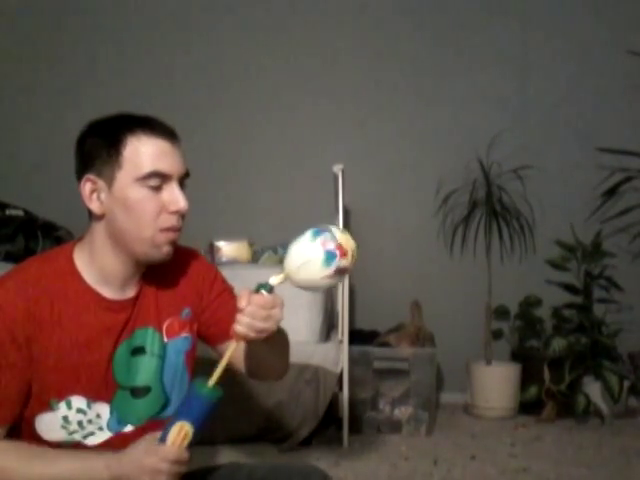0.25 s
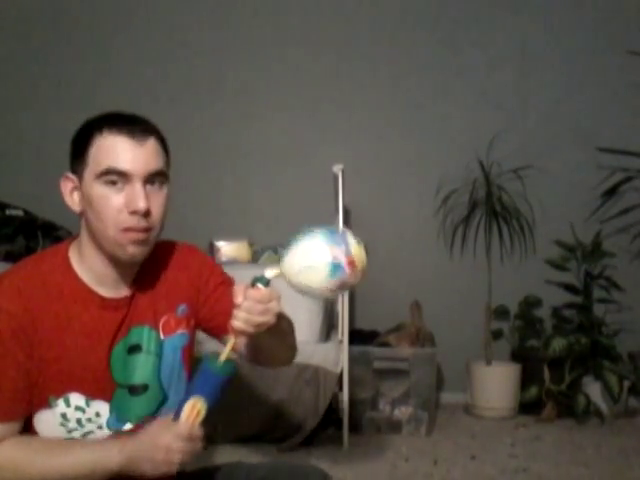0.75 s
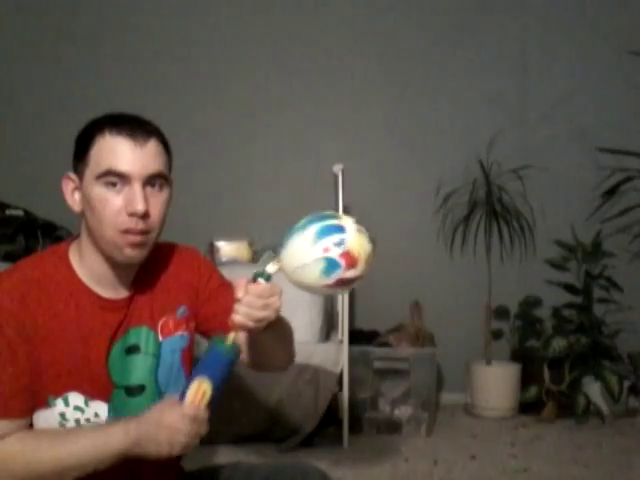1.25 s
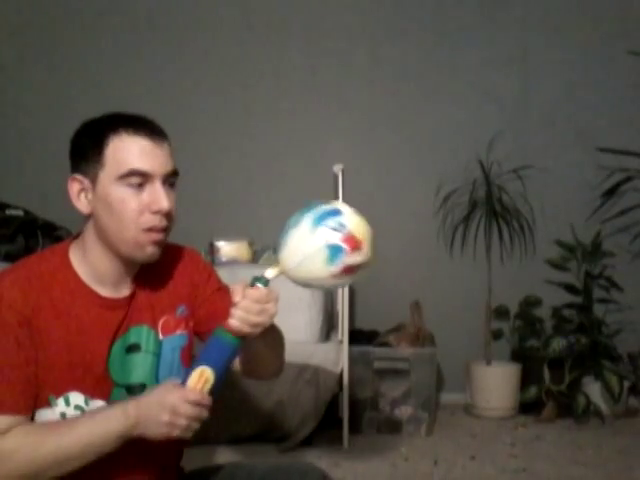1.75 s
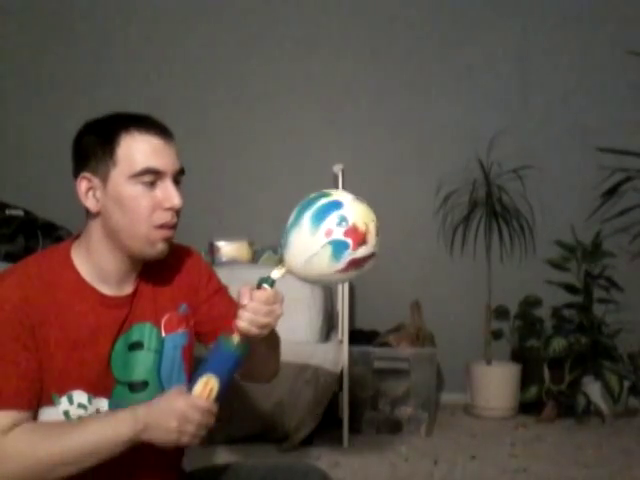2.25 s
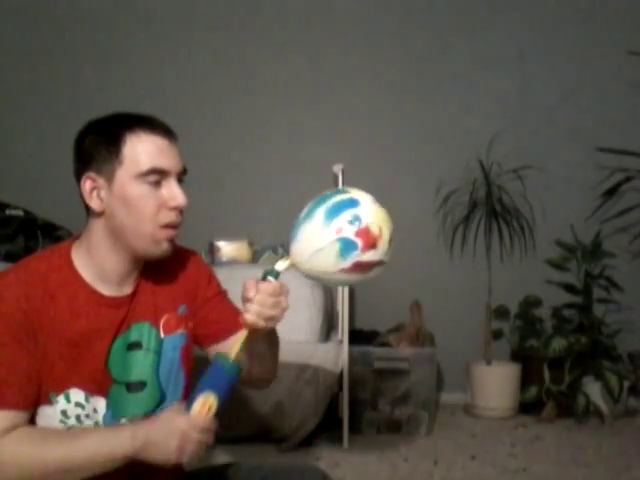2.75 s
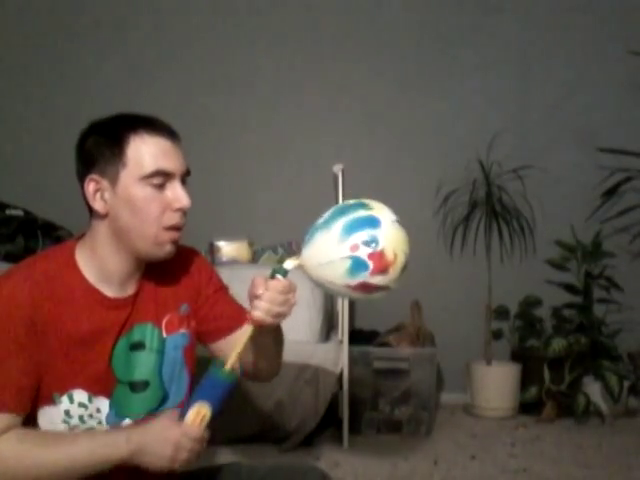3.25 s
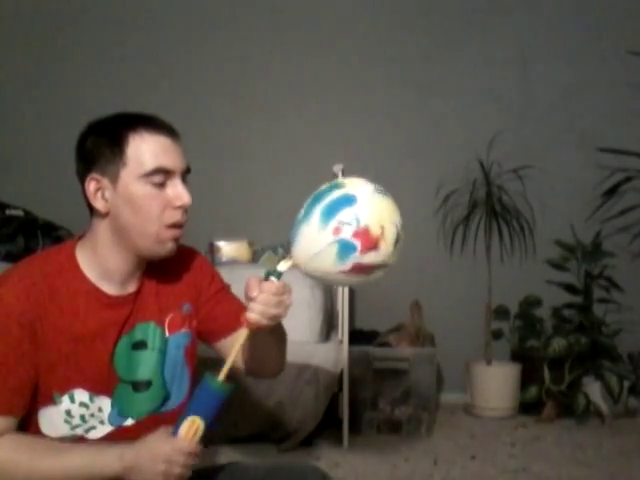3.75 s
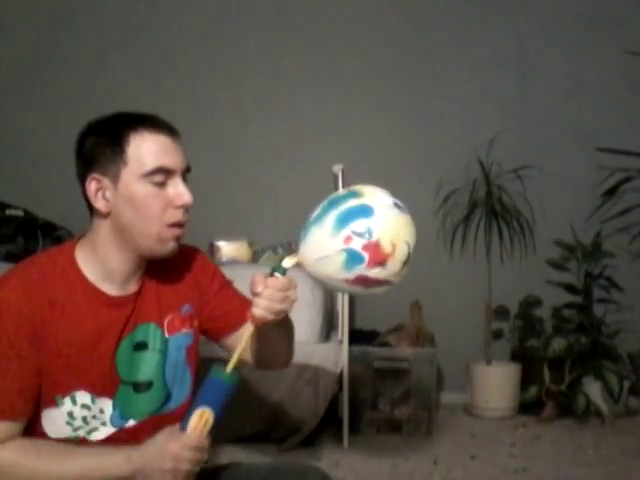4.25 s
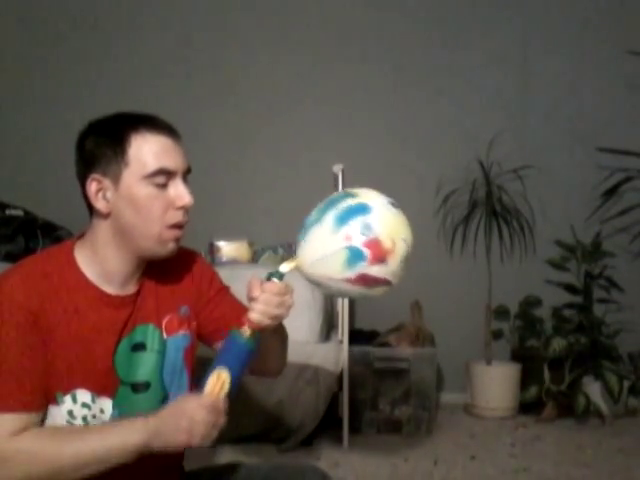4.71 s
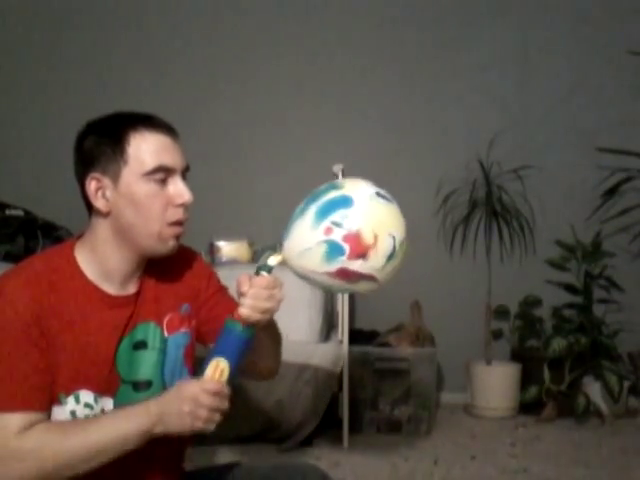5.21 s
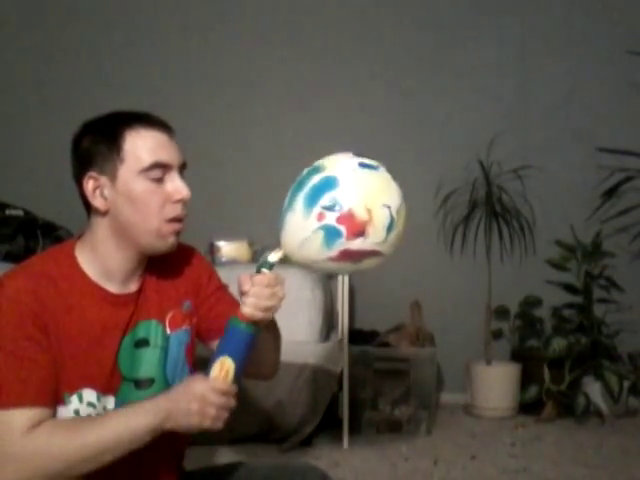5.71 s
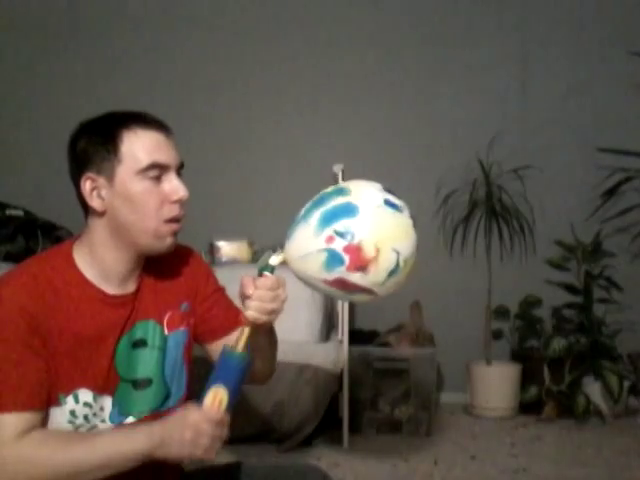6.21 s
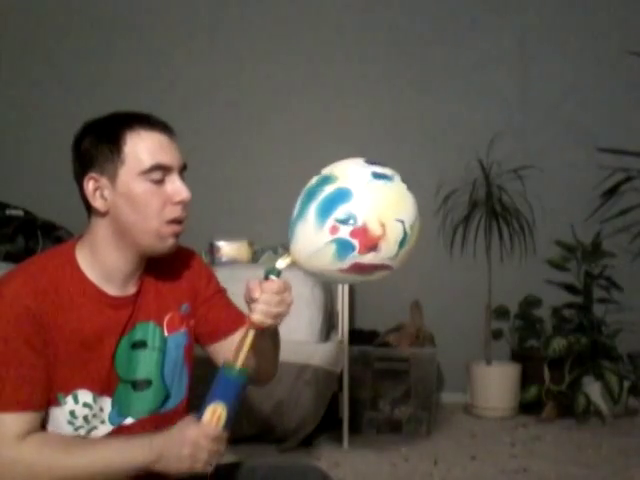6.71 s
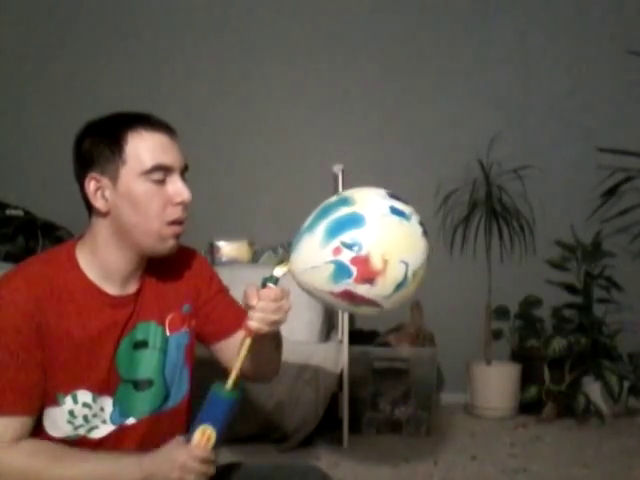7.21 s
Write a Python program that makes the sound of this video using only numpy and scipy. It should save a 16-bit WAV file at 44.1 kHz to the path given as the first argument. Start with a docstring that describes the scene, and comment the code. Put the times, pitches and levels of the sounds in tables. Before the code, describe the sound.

A quiet room with a faint, low ambient noise. From the very start a hand pump is already mid-stroke, and it continues to the end at about 7.4 seconds, roughly three and a half strokes a second. Each stroke is a quarter-second burst of turbulent hiss, strongest around 3 to 5.5 kilohertz, swelling and tapering with the piston, with only a brief dip between. Strokes vary: some louder, some brighter, pulls and pushes alternating. Beneath is a softer, duller rush in the barrel. Every second stroke begins with a tiny rising valve plop. Small hollow plastic knocks with a low thump end pulls near 0.7, 4.7 and 5.8 seconds, a very faint one near 3.6. Sharper little spurts of air open strokes around 1.35, 3.7, 3.95 and 5.7. The balloon's resonant colour slowly sinks and becomes less marked as it swells. Short room echo follows; no bursting.

```python
"""In a quiet living room a two-way hand pump fills a latex balloon, three and a half strokes a second.
Each stroke drives a turbulent jet through the nozzle: coloured noise whose strength follows piston speed.
Air modes of the balloon colour the hiss and sink in pitch as it swells; a duller rush fills the barrel.
Decaying sines make the piston's knocks at the end of some pulls; a rising sine is the valve's plop
at every second turn. Decaying noise makes the echo of the room."""
import sys
import numpy as np
from scipy import signal
from scipy.fft import rfft, irfft, next_fast_len
from scipy.io import wavfile
from scipy.ndimage import uniform_filter1d, map_coordinates

SR = 44100
rng = np.random.default_rng(int(sys.argv[2]) if len(sys.argv) > 2 else 0)


def wrap_up_sound(samples):
    """Save the sound to the file named by the first command line argument, as 16-bit audio."""
    columns = np.atleast_2d(samples).T
    # keep every value between -1 and 1, then stretch to whole-number steps
    tamed = np.clip(columns, -1, 1)
    steps = np.round(tamed * 32767).astype(np.int16)
    wavfile.write(sys.argv[1], SR, steps)


N = 328986

# Piston strokes, pull and push in turn; the brightness grows with the root of the piston speed:
# (start [s], length [s], peak jet level [dB], brightness at full speed, before the common speed term [dB])
STROKES = [(-0.103, 0.25, -22.5, -3), (0.203, 0.22, -18.5, -3), (0.483, 0.25, -16.5, 3),
           (0.777, 0.24, -20, -1), (1.069, 0.23, -15.5, 4), (1.328, 0.24, -17, 0.5),
           (1.61, 0.27, -15.5, 3.5), (1.9, 0.26, -20, 2.5), (2.195, 0.27, -15.5, 2),
           (2.479, 0.27, -18.5, 6), (2.77, 0.29, -16, 3), (3.072, 0.23, -18, 2), (3.343, 0.27, -18, 1),
           (3.638, 0.24, -19, 7), (3.916, 0.24, -16.5, 2.5), (4.205, 0.25, -18, -0.5),
           (4.497, 0.27, -16.5, -0.5), (4.805, 0.26, -21.5, 1.5), (5.087, 0.26, -18.5, 2.5),
           (5.368, 0.24, -19, 5), (5.637, 0.26, -15.3, 3.5), (5.944, 0.26, -18, 6), (6.217, 0.28, -19, 0.5),
           (6.507, 0.25, -22, -0.5), (6.797, 0.21, -16, 3.5), (7.063, 0.25, -21.3, 4.5),
           (7.363, 0.21, -18, 2)]


def amp(db):
    """Level to amplitude: 20 dB is a factor of ten."""
    return 10 ** (np.asarray(db) / 20)


def unit(x):
    """Normalisation to equal power: rms 1."""
    return x / np.sqrt(np.mean(x ** 2) + 1e-20)


def along(points, hz):
    """Interpolation of (frequency [Hz], value) points on a logarithmic frequency axis."""
    f, value = np.transpose(points)
    return np.interp(np.log(hz + 1), np.log(f + 1), value)


def lift(modes, hz):
    """Resonance curves: each mode adds a Lorentzian bell in dB, the width taken at half its lift."""
    return sum(db / (1 + (2 * (hz - centre) / width) ** 2) for centre, width, db in modes)


def wobble(rate):
    """Slow random modulation: a smooth curve through random knots, rate of them a second."""
    knots = rng.standard_normal(int(N * rate / SR) + 4)
    return map_coordinates(knots, [np.arange(N) * rate / SR])


def filtered(x, response):
    """Linear filtering: the spectrum times a response of frequency."""
    size = next_fast_len(N + SR // 2)
    spectrum = rfft(x, size) * response(np.fft.rfftfreq(size, 1 / SR))
    return irfft(spectrum, size)[..., :N]


def noise(spectrum):
    """Coloured noise: white noise shaped by a spectral density, then set to rms 1."""
    return unit(filtered(rng.standard_normal(N), lambda hz: amp(along(spectrum, hz))))


def add(track, s, sound):
    """Superposition: mix a sound into the track at time s."""
    at = round(s * SR)
    part = sound[max(-at, 0):N - at]
    track[max(at, 0):][:len(part)] += part


def background(floor_db=-54, drift_db=0.3):
    """Stationary ambient noise of the room, its level drifting slightly."""
    # Colour of the ambient noise: (frequency [Hz], relative spectral density [dB])
    floor = [(20, -4), (42, -6), (80, 4.5), (130, 2), (200, -4.5), (300, -1.5), (480, -4.5), (800, -4.5),
             (2000, -14.5), (6000, -8), (14500, -23)]
    return amp(floor_db + drift_db * wobble(14)) * noise(floor)


def room(x, delay_s=0.005):
    """Reverberation by convolution: the treble decays sooner; the pump moves, so each stroke has its own tail."""
    # Reverberation of the room: (frequency [Hz], time to decay by 60 dB [s])
    decay_times = [(150, 0.34), (1000, 0.4), (4000, 0.34), (8000, 0.25), (14000, 0.028)]
    out = np.zeros(N)
    turns = [0] + [round(s * SR) for s, *_ in STROKES[1:]] + [N]
    for start, end in zip(turns, turns[1:]):
        hz, t, z = signal.stft(rng.standard_normal(SR * 2 // 3), SR, nperseg=256)
        decay = amp(-60 * t / along(decay_times, hz)[:, None])
        tail = signal.istft(z * decay, SR, nperseg=256)[1]
        tail = tail / np.linalg.norm(tail)
        add(out, start / SR + delay_s, signal.fftconvolve(x[start:end], tail))
    return out


def piston(knock_hz=490, knock_s=0.0016, thump_hz=112, thump_s=0.0052, thump_delay_s=0.0102):
    """Impact excitation: at the end stop the plastic barrel rings as a short knock, and a low thump follows."""
    # Impacts at the end of a pull; levels are envelope peaks: (time [s], knock level [dB], thump level [dB])
    knocks = [(0.678, -35, -44), (3.593, -46, -47), (4.732, -31.5, -44), (5.839, -36, -43)]
    out, t = np.zeros(N), np.arange(SR // 8) / SR

    def ring(hz, life):
        return t / life * np.exp(1 - t / life) * np.sin(2 * np.pi * hz * t)

    for s, knock_db, thump_db in knocks:
        add(out, s, amp(knock_db) * ring(knock_hz, knock_s))
        add(out, s + thump_delay_s, amp(thump_db) * ring(thump_hz, thump_s))
    return out


def valve(plop_db=-37, plop_hz=305, rise_per_s=45, swell_s=0.0033):
    """Transient of a closing flap: it seats as each push begins, with a short plop of rising pitch."""
    out, t = np.zeros(N), np.arange(SR // 30) / SR
    shape = (t / swell_s) ** 2 * np.exp(1 - (t / swell_s) ** 2)  # peaks at 1 after swell_s
    for s, *_ in STROKES[1::2]:
        # every plop has a slightly different pitch
        pitch = plop_hz * (1 + rise_per_s * t) * np.exp(rng.normal(0, 0.15))
        phase = 2 * np.pi * np.cumsum(pitch) / SR
        add(out, s - .001, amp(plop_db) * shape * np.sin(phase))
    return out


def radius_cm(t, start_litres=0.57, stroke_litres=0.19):
    """Volume of a sphere: every stroke adds the same air, so the radius grows as the cube root."""
    strokes_done = sum(np.clip((t - s) / length, 0, 1) for s, length, *_ in STROKES)
    litres = start_litres + stroke_litres * strokes_done
    return np.cbrt(1000 * litres * 3 / (4 * np.pi))


def airflow(spurt_s=0.0072, speed_bright_db=5, pull_rush_db=-38.5, push_rush_db=-41):
    """Flow noise grows with flow speed: gains of jet and barrel rush, and the brightness in dB."""
    # The valve snaps open and lets out a spurt: (time, 3 ms after its onset [s], peak level [dB])
    spurts = [(1.363, -28), (3.712, -30), (3.958, -26.5), (5.674, -33)]
    speeding, slowing = 0.37, 0.6  # shares of a stroke in which the piston gathers and loses speed
    opens_at, jet_power = 0.07, 1.83  # share of full speed that opens the valve; growth exponent beyond it
    jet, rush, bright_db = np.zeros(N), np.zeros(N), np.zeros(N)

    def ease(u):
        return np.sin(np.pi / 2 * np.clip(u, 0, 1))

    for k, (s, length, db, tilt_db) in enumerate(STROKES):
        done = np.linspace(0, 1, int(length * SR))
        speed = ease(done / speeding) * ease((1 - done) / slowing)
        rush_db = push_rush_db if k % 2 else pull_rush_db
        through = np.clip((speed - opens_at) / (1 - opens_at), 0, 1)
        add(jet, s, amp(db) * through ** jet_power)
        add(rush, s, amp(rush_db) * speed)
        add(bright_db, s, tilt_db * np.sqrt(speed) + speed_bright_db * (speed - .8))
    age = np.arange(SR // 10) / SR / spurt_s
    for s, db in spurts:
        add(jet, s - .003, amp(db) * age * np.exp(1 - age))
    return jet, rush, bright_db


def balloon(x, patchy_db=2.5, reference_cm=7.5):
    """Cavity resonance: mode frequencies fall as 1 / radius, and crowded modes stand out less."""
    # Air modes and the nulls between them at the reference radius: (frequency [Hz], width [Hz], lift [dB])
    air_modes = [(860, 260, 4), (1450, 200, -3), (2070, 440, 5), (2430, 200, -3), (2930, 300, 5),
                 (3370, 180, 4), (3650, 200, -4), (3950, 240, 6), (4400, 240, -4), (4730, 240, 7),
                 (5230, 260, -4), (5620, 260, 8), (6050, 220, -3), (6431, 280, 6), (7270, 280, 4)]
    hz, t, z = signal.stft(x, SR, nperseg=1024)
    swell = radius_cm(t) / reference_cm
    colour = lift(air_modes, hz[:, None] * swell) / np.maximum(swell, .85) ** 2.5
    # the balloon sways on the nozzle, so the colour never quite repeats
    sway = uniform_filter1d(rng.standard_normal(z.shape), size=3, axis=0)
    sway = uniform_filter1d(sway, size=14, axis=1)
    gain = amp(colour + patchy_db * unit(sway))
    # the modes only share out the power of the jet
    power = np.mean(np.abs(z) ** 2, axis=1)
    gain /= np.sqrt(power @ gain ** 2 / power.sum())
    return unit(signal.istft(z * gain, SR, nperseg=1024)[1][:N])


def air(flutter_db=1.05, grain_db=0.65, split_hz=4600):
    """Turbulent flow noise: a jet into the balloon, over a duller rush in the barrel."""
    # Colour of the jet: (frequency [Hz], relative spectral density [dB])
    jet_colour = [(300, -47.5), (1100, -22.5), (2000, -23.5), (2500, -15.5), (3200, -7.5), (3600, -5),
                  (4400, -1), (5300, -1), (5900, -10), (6600, -17.5), (8000, -26.5), (10000, -31.5),
                  (12500, -32), (14500, -28)]
    # Fixed resonances and notches of nozzle and valve: (frequency [Hz], width [Hz], lift [dB])
    nozzle = [(2120, 140, 5), (2900, 380, 5.5), (3140, 110, -4), (3470, 280, 8), (4000, 300, 5),
              (4560, 100, -2), (5290, 200, 2), (11400, 700, 4)]
    # Colour of the air rushing through the barrel: (frequency [Hz], relative spectral density [dB])
    barrel = [(100, -93), (220, -5), (350, -4), (480, 3.5), (650, 2), (850, -0.5), (1200, -0.5),
              (1500, 3.5), (2200, 4.5), (4000, -13)]
    jet, rush, bright_db = airflow()
    hiss = balloon(filtered(noise(jet_colour), lambda hz: amp(lift(nozzle, hz))))
    # brightness tips the hiss about its middle
    lower = filtered(hiss, lambda hz: 1 / (1 + (hz / split_hz) ** 8))
    upper = hiss - lower
    hiss = amp(-bright_db / 2) * lower + amp(bright_db / 2) * upper
    turbulence = amp(flutter_db * wobble(45) + grain_db * wobble(400))
    return turbulence * (jet * hiss + rush * noise(barrel))


def scene(room_db=-7):
    """Superposition of the quiet room, the pump with its balloon, and their reverberation."""
    pump = air() + valve() + piston()
    return (pump + amp(room_db) * room(pump) + background())[None]


def record(dry, top_hz=14600):
    """Band limitation: an ideal low-pass leaves nothing at or above top_hz."""
    return filtered(dry, lambda hz: hz < top_hz)


dry = scene()
out = record(dry)
wrap_up_sound(out)
```